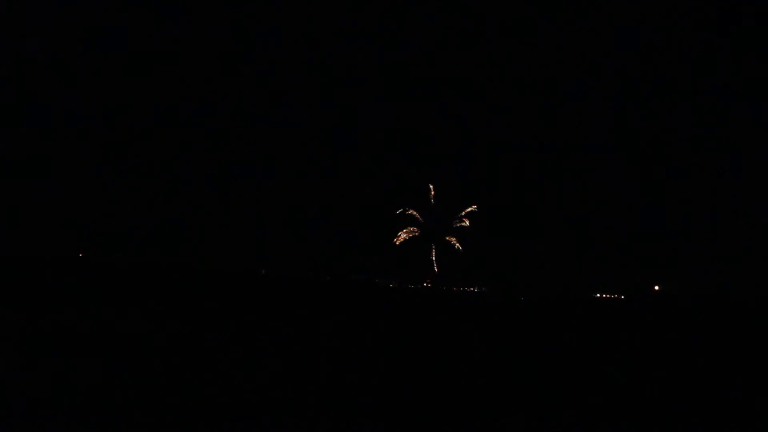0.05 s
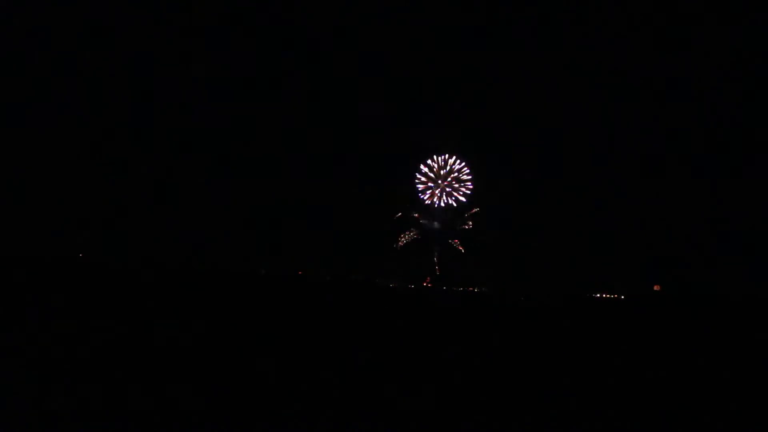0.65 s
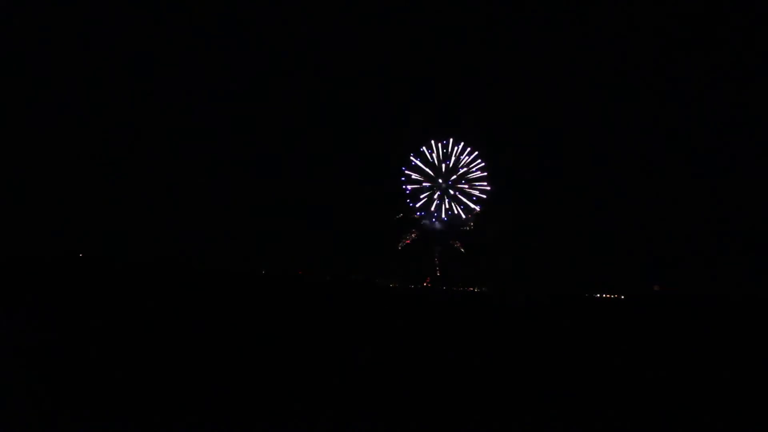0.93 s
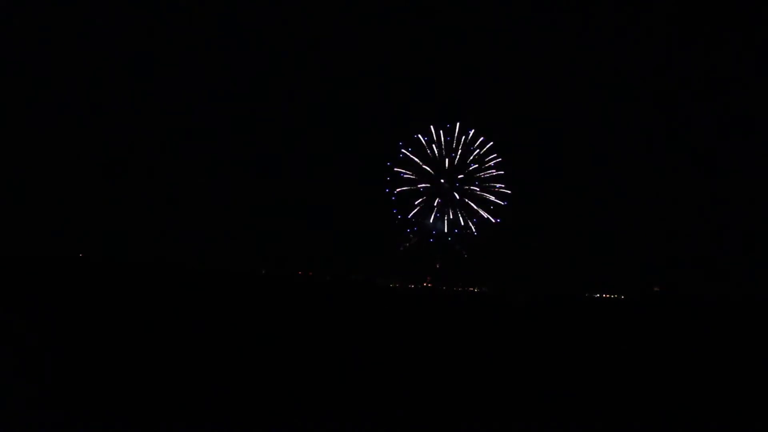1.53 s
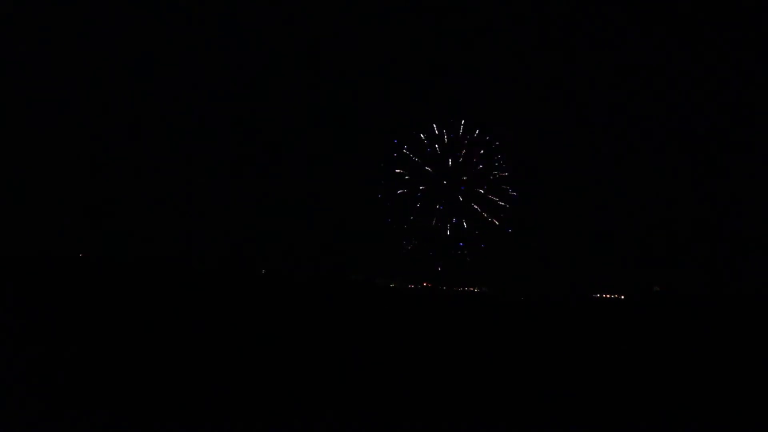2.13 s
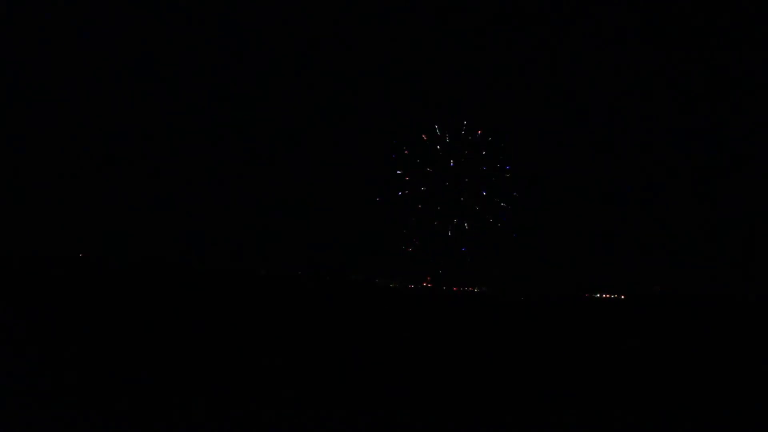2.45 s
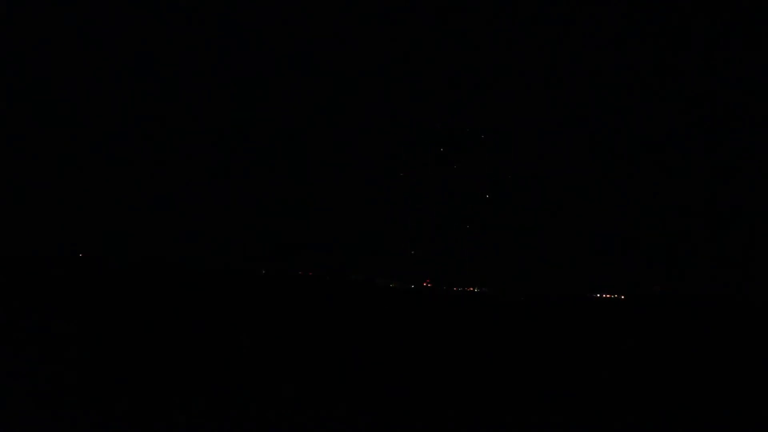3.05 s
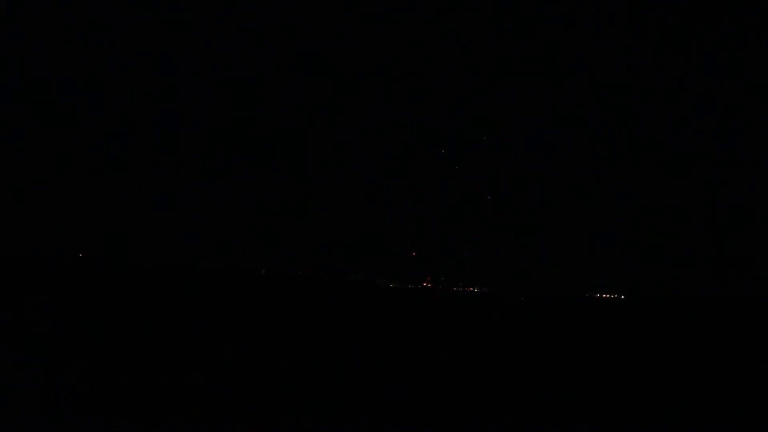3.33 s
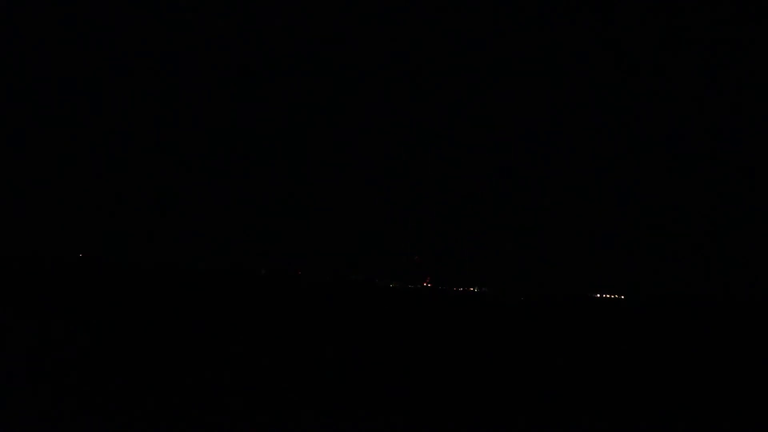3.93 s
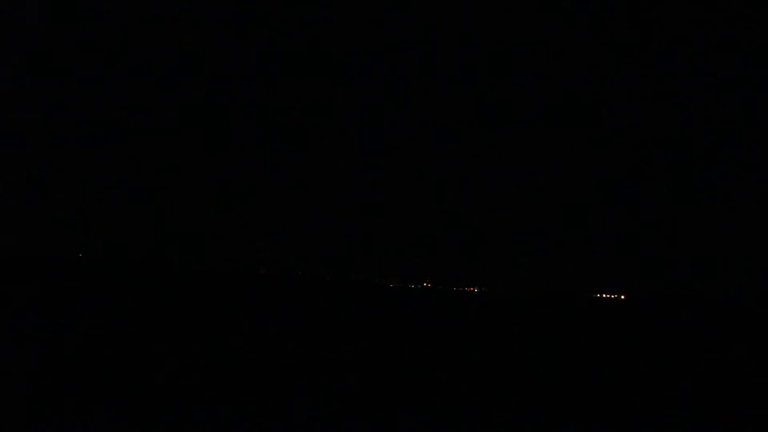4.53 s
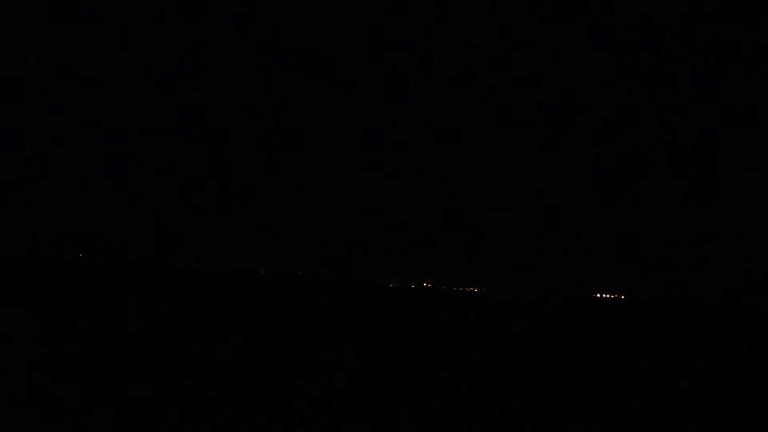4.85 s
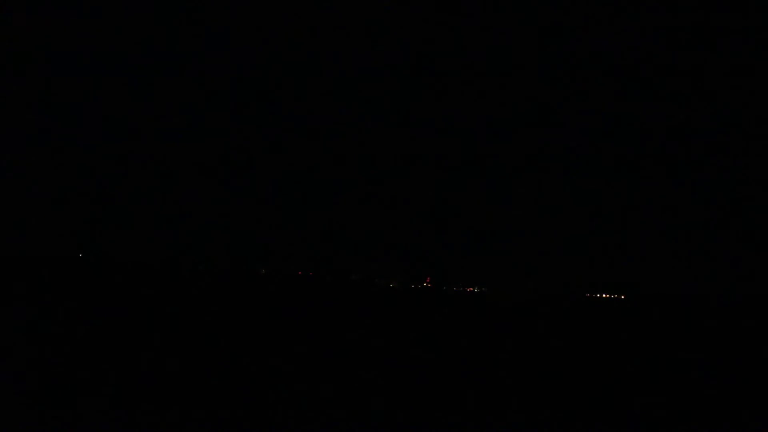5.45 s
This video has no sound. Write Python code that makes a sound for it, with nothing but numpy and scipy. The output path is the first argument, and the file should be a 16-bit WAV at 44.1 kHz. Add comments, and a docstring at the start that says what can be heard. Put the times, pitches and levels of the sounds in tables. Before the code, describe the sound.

Outdoors at night, three distant firework bangs sound a few seconds apart, each echoing away across open land. The first two are rounded thumps; the last is a sharp crack that briefly overloads the microphone. Wind rumbles against the microphone in uneven puffs, light at first and strongest around the final bang. Underneath are a steady quiet hiss, a few muffled far thuds and tiny ticks from a focusing lens.

```python
"""Firework shells burst far off over open country at night: three bangs and a few faint thuds.
Each bang is one pressure swing that bounces off the ground, scatters and rolls away over the land.
The last and sharpest overloads the recorder, whose limiter ducks and recovers.
Wind puffs against the camera's two microphone ports, and its lens ticks softly as it hunts for focus.
Underneath lie a steady hiss and, early on, the faint drone of a far motor."""
import sys
import numpy as np
from scipy import signal
from scipy.fft import rfft, irfft, next_fast_len
from scipy.io import wavfile
from scipy.ndimage import uniform_filter1d, map_coordinates

SR = 44100
rng = np.random.default_rng(int(sys.argv[2]) if len(sys.argv) > 2 else 0)


def persist_wave(psi):
    """Save psi, clipped to +-1, as 16-bit WAV."""
    counts = np.round(np.clip(psi, -1, 1) * 32767).astype(np.int16)
    wavfile.write(sys.argv[1], SR, np.atleast_2d(counts).T)


N = 246519


def amp(db):
    """Decibels to gain."""
    return 10 ** (np.asarray(db) / 20)


def clock():
    """The time of every sample."""
    return np.arange(N) / SR


def along(points, hz):
    """(Hz, value) points read on a log axis."""
    f, v = np.transpose(points)
    return np.interp(np.log(hz + 1), np.log(f + 1), v)


def wobble(rate):
    """A smooth random curve, rate knots a second."""
    return map_coordinates(rng.standard_normal(int(N * rate / SR) + 4), [clock() * rate])


def filtered(x, response):
    """x times a response of frequency."""
    m = next_fast_len(N + 8192)
    return irfft(rfft(x, m) * response(np.fft.rfftfreq(m, 1 / SR)), m)[..., :N]


def noise(spectrum, alike):
    """Stereo noise of rms 1; alike is the left-right likeness, one value or (Hz, value) points."""
    def response(hz):
        likeness = along(alike, hz) if np.ndim(alike) else np.full(len(hz), alike)
        turn = np.arccos(np.clip(likeness, -1, 1)) / 2
        return amp(along(spectrum, hz)) * np.array([np.cos(turn), np.sin(turn)])
    mid, side = filtered(rng.standard_normal((2, N)), response)
    pair = np.array([mid + side, mid - side])
    return pair / pair.std()


def even(pair, size):
    """Noise held at rms 1 over every stretch of size samples."""
    power = uniform_filter1d(uniform_filter1d(np.mean(pair ** 2, axis=0), size), size)
    return pair / np.sqrt(np.abs(power) + 1e-9)


def fade(s, t60, attack):
    """An envelope that rises smoothly at time s and dies away."""
    age = np.maximum(clock() - s, 0)
    return (1 - np.exp(-(age / attack) ** 2)) * np.exp(-np.log(1000) * age / t60)


# tone of the noise bed: f/Hz, relative level/dB
HISS_SPECTRUM = [(30, 10), (200, 12), (400, 11.5), (700, 6.5), (1200, 5), (2200, 1.5), (4500, -2),
                 (6000, -4), (8500, -7.5), (11500, -11.5), (15000, -15.5)]
# its stereo width: f/Hz, left-right correlation
HISS_CORRELATION = [(150, -0.15), (400, 0.089), (900, -0.36), (2200, -0.5), (5000, -0.22), (10000, -0.016)]

def hiss(level_db=-52.5):
    """Night air and the microphone's own steady noise make a wide, soft bed."""
    return amp(level_db) * noise(HISS_SPECTRUM, HISS_CORRELATION)


# the motor's two tones at the top of their swell: f/Hz, rms level/dB
MOTOR_TONES = [(393, -64), (433, -69)]

def motor_drone(drift_hz=3.65, peak_s=0.92, swell_s=0.67):
    """A far motor hums unsteadily, swelling and fading on the wind."""
    hum = np.zeros(N)
    for hz, db in MOTOR_TONES:
        pitch = hz + drift_hz * wobble(5.25)
        hum += amp(db) * np.sin(2 * np.pi * np.cumsum(pitch) / SR)
    return np.sqrt(2) * hum * np.exp(-((clock() - peak_s) / swell_s) ** 2)


# hollow tone of a lens tick: f/Hz, relative level/dB
TICK_SPECTRUM = [(150, -9), (400, -15), (650, 14), (1000, 4), (1500, -13), (2500, -21), (8000, -67)]
# the focus motor's effort, heard as tick strength: t/s, level/dB
FOCUS_EFFORT = [(0, -51), (.65, -49.5), (.8, -63), (1.45, -60), (1.55, -47), (2.6, -49.5), (5.59, -51)]

def lens_ticks(first_s=0.008, run_every_s=0.36, step_s=0.08):
    """The focus motor hunts in the dark: runs of four soft ticks with a short rest between."""
    run_starts = np.arange(first_s, N / SR, run_every_s)
    times = (run_starts[:, None] + step_s * np.arange(4)).ravel()
    levels_db = np.interp(times, *np.transpose(FOCUS_EFFORT)) + rng.standard_normal(len(times))
    envelope = sum(amp(db) * fade(start, t60=0.067, attack=0.002) for start, db in zip(times, levels_db))
    return even(noise(TICK_SPECTRUM, alike=0.73), size=256) * envelope


# contour of the breeze at the ports: t/s, relative level/dB
BREEZE_CONTOUR = [(0, -46), (0.5, -46.5), (0.72, -37.5), (1.1, -54), (1.66, -44), (1.91, -60.5),
                  (2.04, -40), (2.18, -48.5), (2.7, -36), (3.46, -25.5), (3.66, -39), (3.88, -38.5),
                  (4.12, -23), (4.48, -32.5), (4.6, -21.5), (5.24, -24.5), (5.35, -56.5), (5.58, -33)]
# accents from the strongest single eddies: t/s, relative level/dB
STRONG_PUFFS = [(0.109, -24.5), (0.264, -26.5), (0.366, -28), (0.692, -25), (0.804, -27.5), (0.922, -21.5),
                (1.16, -34.5), (1.702, -29.5), (2.356, -23), (2.765, -17.5), (3.125, -17), (3.457, -16.5),
                (3.766, -14.5), (4.11, -14.5), (4.576, -8), (4.648, -9.5), (4.755, -7.5), (5.131, -8),
                (5.235, -15)]

def airflow(trim_db=-2.0, flutter_db=3.5, puff_s=0.012, puffs_per_s=12, lift_db=4.5, spread_db=3.5):
    """The wind's envelope: a fluttering breeze, strong puffs, and lesser ones riding on it by chance."""
    t = clock()
    breeze_db = np.interp(t, *np.transpose(BREEZE_CONTOUR))
    breeze = amp(breeze_db + trim_db + flutter_db * wobble(40))
    gap_draw, level_draw = rng.random(size=(96, 2)).T
    times = np.cumsum(0.5 + gap_draw) / puffs_per_s
    levels_db = np.interp(times, t, breeze_db) + lift_db + spread_db * (2 * level_draw - 1)
    lesser_puffs = [(at, db) for at, db in zip(times, levels_db) if at < t[-1]]
    puff_power = sum(amp(db) ** 2 * np.exp(-2 * np.minimum(((t - at) / puff_s) ** 2, 20))
                     for at, db in list(STRONG_PUFFS) + lesser_puffs)
    return np.sqrt(breeze ** 2 + puff_power)


# rumble bands, large eddies to small: f/Hz, share in a strong gust/dB, share growth/(dB per dB of wind)
EDDY_BANDS = [(46.5, -14.5, -0.52), (84.4, -3, -0.22), (132.7, -2.5, 0.61), (214, -11, 1.23),
              (415, -36.5, 1.3)]
# pan, set by which port faces the wind: t/s, left minus right/dB
WIND_PAN = [(0, -3.5), (2.4, -4), (3.5, 5.5), (3.9, 7), (4.15, -2), (4.6, -4), (4.8, 5), (5.2, 2.5),
            (5.5, -7)]

def wind(strong_gust_db=-18, gust_s=0.15, skirt_db=-21):
    """Eddies press on the two ports in opposite senses; a sustained gust sheds smaller, higher eddies."""
    flow = airflow()
    gust = uniform_filter1d(flow, int(gust_s * SR)) / amp(strong_gust_db)
    rumble = np.zeros((2, N))
    for hz, share_db, growth in EDDY_BANDS:
        hump = [(hz * 2. ** octave, skirt_db * abs(octave) ** 1.3) for octave in np.linspace(-3, 3, 13)]
        band = even(noise(hump, alike=-0.73), size=int(2 * SR / hz))
        rumble += amp(share_db) * gust ** growth * band
    pan_db = np.interp(clock(), *np.transpose(WIND_PAN))
    return flow * amp([pan_db / 2, -pan_db / 2]) * rumble


# cues for the faint far reports: t/s, level/dB, t60/s
THUD_CUES = [(1.8, -53.5, 1), (2.309, -51.5, 0.64), (3.117, -51.5, 0.31), (3.774, -46, 0.04),
             (4.924, -37, 0.26)]
# their muffled tone: f/Hz, relative level/dB
THUD_SPECTRUM = [(100, -22), (350, 0), (600, 3.5), (1050, 3), (1500, -5), (2500, -21), (8000, -80)]

def far_thuds():
    """Faint reports and echoes from far off, with only their roll left."""
    envelope = sum(amp(db) * fade(start, t60, attack=0.00076) for start, db, t60 in THUD_CUES)
    return even(noise(THUD_SPECTRUM, alike=0.93), size=256) * envelope


def swing(t, rise, length):
    """One pressure swing: the steeper its front, the sharper the crack."""
    return np.tanh(t / rise) * np.exp(-(t / length) ** 2)


# the hollow knock that each front leaves: f/Hz, level relative to the shock/dB, t60/s
KNOCK_MODES = [(463, -20.5, 0.1), (1467, -1, 0.0063), (1720, -21, 0.022)]

def shock(start, rise_s, swing_s, bounce_s=0.00162, bounce_db=-8):
    """The transient of a bang: a pressure swing, its ground bounce and a hollow knock."""
    t = clock() - start
    bounce = amp(bounce_db) * swing(t - bounce_s, swing_s, swing_s)  # soft ground rounds off the front
    knock = sum(amp(db) * np.sin(2 * np.pi * hz * t) * fade(start, t60, attack=0.00046)
                for hz, db, t60 in KNOCK_MODES)
    return swing(t, rise_s, swing_s) + bounce + knock


# tone of the early reflections scattered by the ground: f/Hz, relative level/dB
SCATTER_SPECTRUM = [(30, -17), (90, 3.5), (260, 0.5), (500, -4), (760, 3), (1150, -5.5), (1500, -3.5),
                    (2100, -8), (2800, -17), (3600, -27.5), (4500, -35.5), (8000, -100)]
# low body of a bang: f/Hz, relative level/dB
BODY_SPECTRUM = [(80, -51), (190, -15), (300, 4), (450, -7), (620, -15), (1200, -29), (6000, -110)]
# tone of the echo tail rolling over the land: f/Hz, relative level/dB
ROLL_SPECTRUM = [(60, -18), (200, 3.5), (420, 2.5), (600, -3), (1050, -4.5), (1600, -9.5), (2300, -15.5),
                 (3200, -24), (4500, -35.5), (12000, -100)]
# cues for the bangs: t/s, shock/dB, front rise/s, swing/s, scatter/dB, low scatter t60/s, body/dB, roll/dB
SHELL_CUES = [(.0023, -6.5, 0.00068, 0.00073, -14, 0.084, -24, -33.5),
              (2.079, -10.5, 0.00034, 0.00043, -15.5, 0.11, -26.5, -35),
              (4.8379, 9.5, 0.000053, 0.00059, 2, 0.031, -29, -27.5)]

def shell_bursts(lead_s=0.00045, crossover_hz=1900, roll_s=0.045, roll_power=1.032):
    """Each burst arrives as a shock, a cluster of reflections and a long roll from the land around."""
    scatter = even(noise(SCATTER_SPECTRUM, alike=0.98), size=160)
    bright = filtered(scatter, lambda hz: hz ** 4 / (hz ** 4 + crossover_hz ** 4))
    low = scatter - bright
    body = even(noise(BODY_SPECTRUM, alike=1.0), size=512)
    roll = noise(ROLL_SPECTRUM, alike=0.93) * amp(1.33 * wobble(110))
    out = np.zeros((2, N))
    for start, shock_db, rise_s, swing_s, scatter_db, t60, body_db, roll_db in SHELL_CUES:
        out += amp(shock_db) * shock(start, rise_s, swing_s)
        # bright reflections die first, low ones last
        onset = start - lead_s
        out += amp(scatter_db) * bright * fade(onset, 0.73 * t60, attack=0.00054)
        out += amp(scatter_db) * low * fade(onset, t60, attack=0.0036)
        out += amp(body_db) * body * fade(onset, 3.2 * t60, attack=0.0027)
        # later echoes have come from farther away and thin out as a power of time
        thinning = (1 + np.maximum(clock() - start, 0) / roll_s) ** roll_power
        out += amp(roll_db) * roll * fade(start, t60=17.0, attack=0.004) / thinning
    return out * amp([[-0.4], [0.4]])  # a touch right of centre


def scene():
    """The mix at the two ports: bangs in front, wind and small sounds behind."""
    return shell_bursts() + far_thuds() + wind() + lens_ticks() + motor_drone() + hiss()


def limiter(x, threshold_db=-2, attack_s=0.00046, release_s=0.12):
    """Gain ducks quickly by the excess over the threshold and creeps back."""
    peak_db = 20 * np.log10(np.abs(x).max(axis=0) + 1e-9)
    excess_db = np.maximum(peak_db - threshold_db, 1e-6)
    leak = clock() / release_s
    held_db = np.exp(np.maximum.accumulate(np.log(excess_db) + leak) - leak)  # decaying peak hold
    pole = np.exp(-1 / (attack_s * SR))
    duck_db = signal.lfilter([1 - pole], [1, -pole], held_db)
    return x * amp(-duck_db)


def record(dry, high_cut_hz=15750):
    """The limiter is too slow for the sharpest front, which clips; a steep high cut follows."""
    clipped = np.clip(limiter(dry), -1, 1)
    return filtered(clipped, lambda hz: hz < high_cut_hz)


dry = scene()
out = record(dry)
persist_wave(out)
```